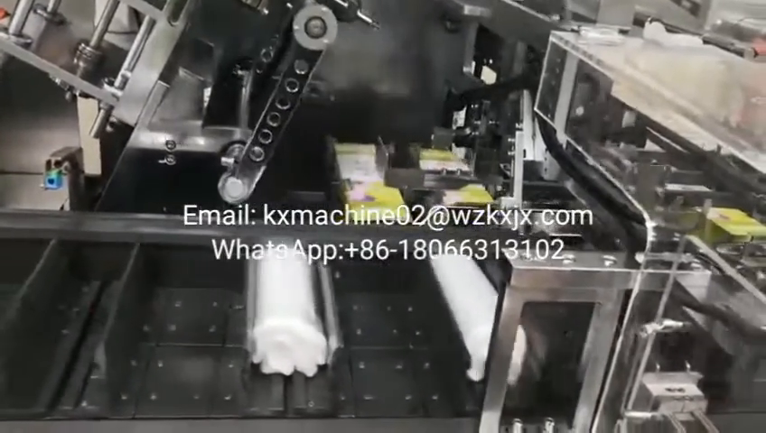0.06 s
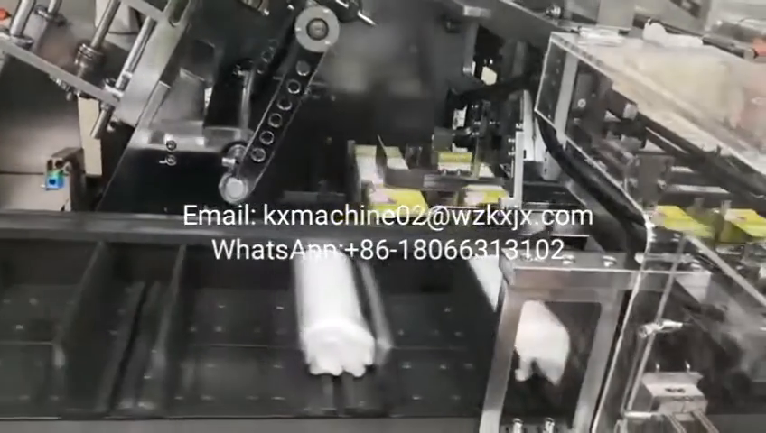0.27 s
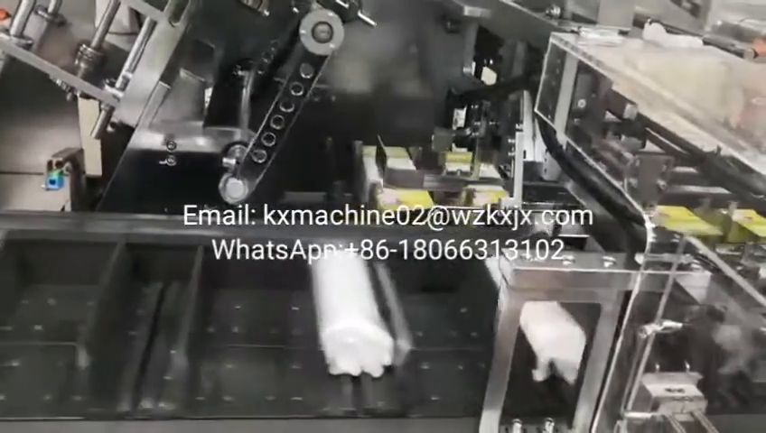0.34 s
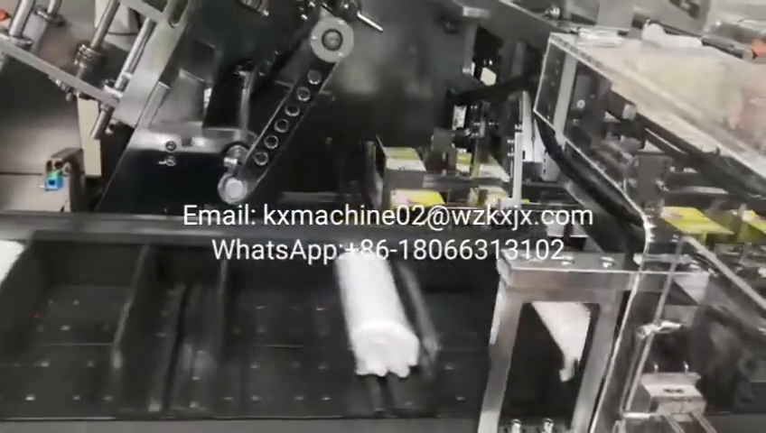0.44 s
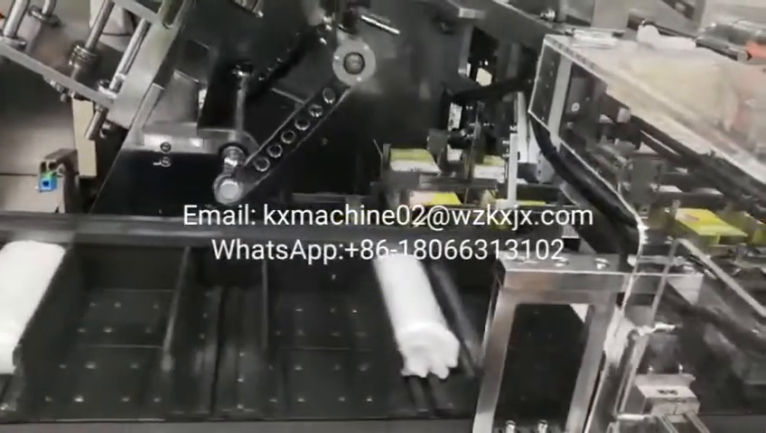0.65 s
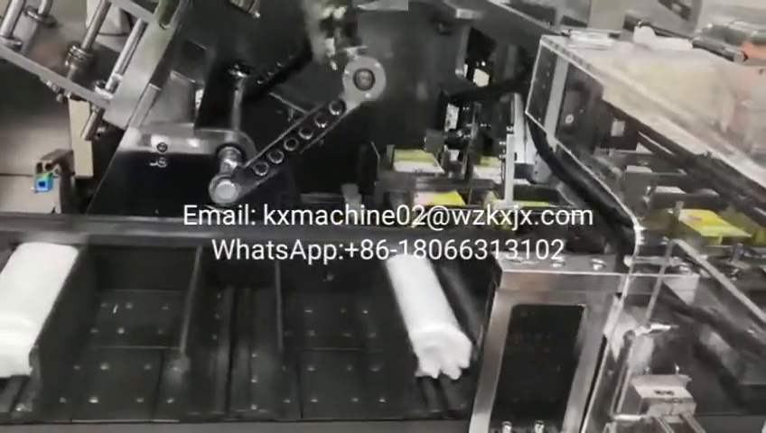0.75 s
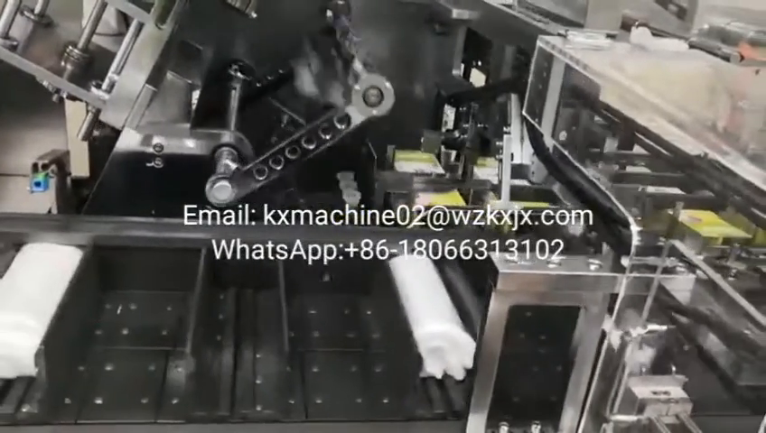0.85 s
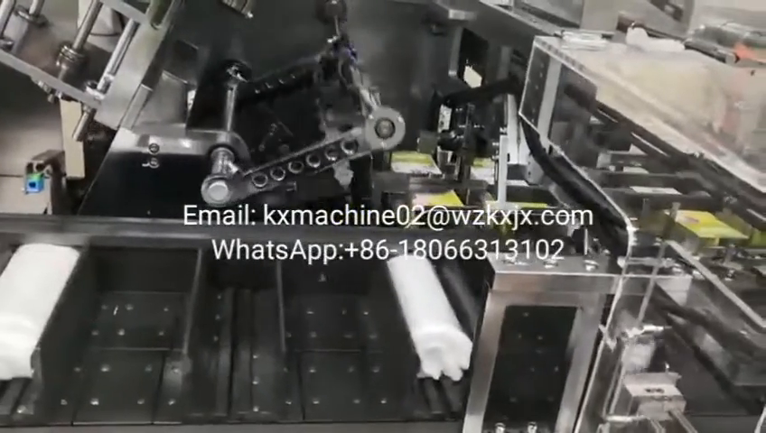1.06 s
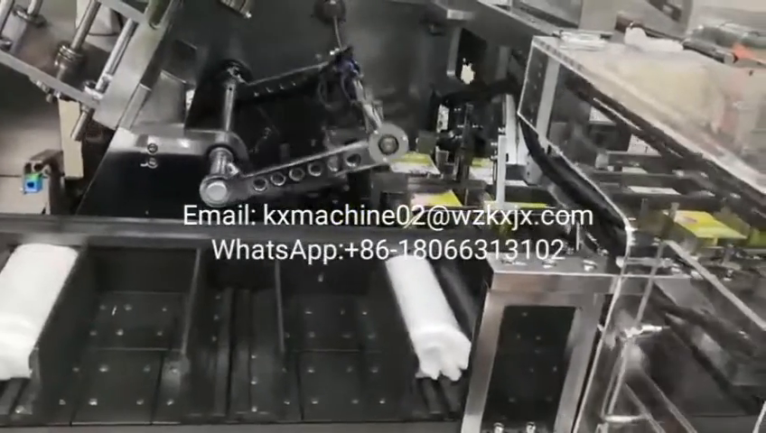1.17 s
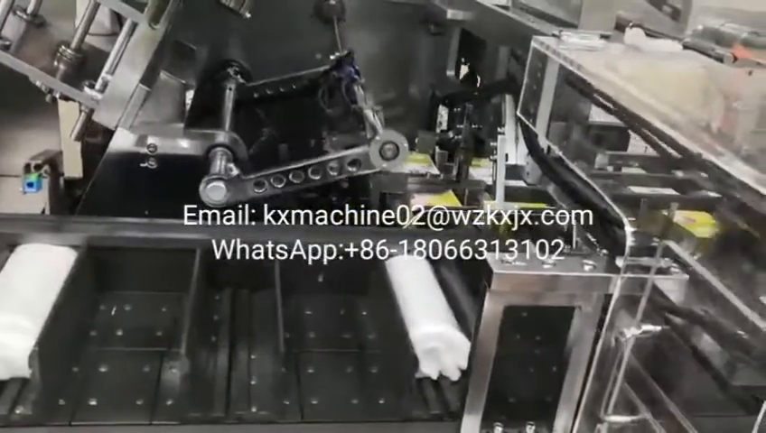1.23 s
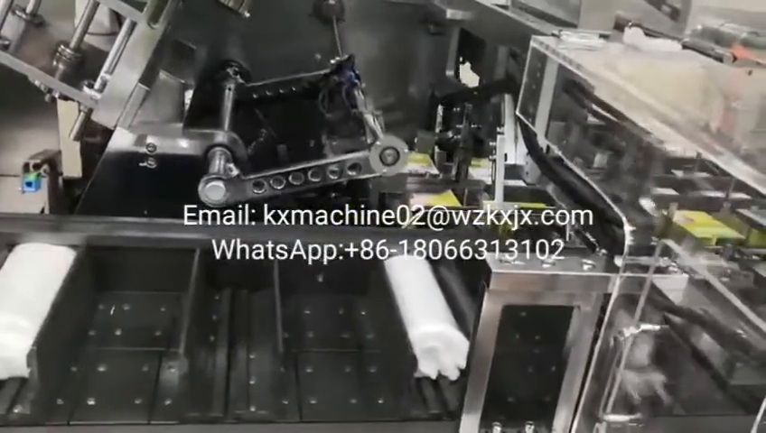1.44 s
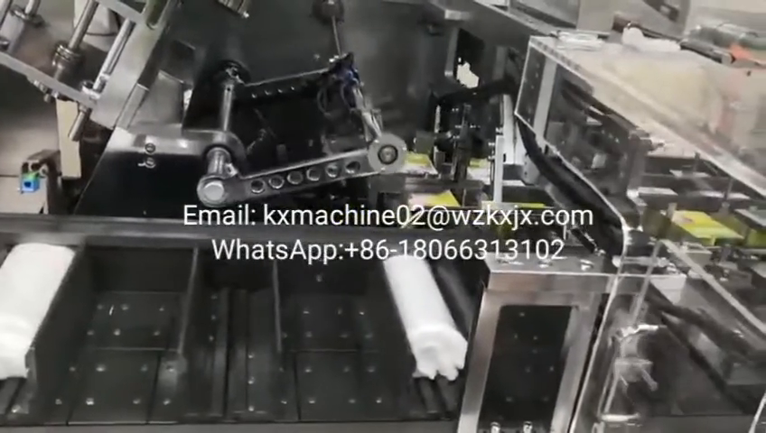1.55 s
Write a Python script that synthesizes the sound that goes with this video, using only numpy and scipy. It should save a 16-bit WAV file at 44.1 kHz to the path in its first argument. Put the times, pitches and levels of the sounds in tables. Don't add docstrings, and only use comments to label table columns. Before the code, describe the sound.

Close view of an automatic packing machine over steady motor whirr and thin gear whine: a swelling roller rush ends in a low thud, air hisses, metal clacks hard with hall echo, and faint distant air sighs.

```python
import sys
import numpy as np
from scipy import signal
from scipy.io import wavfile
from scipy.ndimage import uniform_filter1d

SR = 44100
rng = np.random.default_rng(int(sys.argv[2]) if len(sys.argv) > 2 else 0)


def boost(x):
    u = np.asarray(x, float) / 20
    return 10 ** u


def pcm_store(signal):
    levels = np.round(np.clip(np.atleast_2d(signal), -1, 1) * 32767)
    wavfile.write(sys.argv[1], SR, levels.astype(np.int16).T)


N = 70560
TIME_S = np.arange(N) / SR


def evened(x):
    return x / np.sqrt(np.mean(x ** 2) + 1e-20)


def curve_at(points, hz):
    point_hz, value = np.transpose(points)
    return np.interp(np.log(hz + 1), np.log(point_hz + 1), value)


def coloured(x, spectrum):
    hz = np.fft.rfftfreq(4096, 1 / SR)
    octaves_below = np.maximum(np.log2(spectrum[0][0] / (hz + 5)), 0)
    octaves_above = np.maximum(np.log2(hz / spectrum[-1][0] + 1e-9), 0)
    level_db = curve_at(spectrum, hz) - 24 * (octaves_below + octaves_above)
    half = np.log(boost(np.maximum(level_db, -110)))
    full = np.concatenate([half, half[-2:0:-1]])
    taps = np.fft.ifft(np.exp(np.conj(signal.hilbert(full)))).real
    return signal.oaconvolve(x, taps / np.linalg.norm(taps))[:len(x)]


def lumpy(patchy_db, flicker_db):
    a, b, patch = rng.standard_normal((N // 64 + 8, 129, 3)).T
    patch = uniform_filter1d(patch, size=3, axis=0)
    patch = evened(uniform_filter1d(patch, size=24, axis=1))
    flicker = evened(uniform_filter1d(rng.standard_normal(a.shape[1]), size=8))
    z = (a + 1j * b) * boost(patchy_db * patch + flicker_db * flicker)
    noise = signal.istft(z, nperseg=256, noverlap=192)[1]
    return evened(noise[256:N + 256])


def resonate(x, hz, width_hz):
    turn = np.exp(2j * np.pi * np.cumsum(hz * np.ones(len(x))) / SR)
    r = np.exp(-np.pi * width_hz / SR)
    return 2 * (turn * signal.lfilter([1 - r], [1, -r], x / turn)).real


def effort(curve, lead_s=0):
    time_s, level_db = np.transpose(curve)
    level_db = np.interp(TIME_S + lead_s, time_s, level_db, left=-120, right=-120)
    return uniform_filter1d(boost(level_db), size=120)


def burst(start_s, rise_s, level_db, t60_s):
    fall_db = 60 * np.maximum(TIME_S - start_s - rise_s, 0) / t60_s
    return np.clip((TIME_S - start_s) / rise_s, 0, 1) * boost(level_db - fall_db)


def blows(events, modes, rise_s):
    # hz, level_db
    knock_colour = [(25, -24), (70, 0), (4500, 0), (6000, -6), (8000, -30), (15000, -60)]
    out = np.zeros(N)
    t = np.arange(SR // 3) / SR
    chance = rng.standard_normal((len(events), len(modes), 2))
    middle_hz = modes[len(modes) // 2][0]
    for (start_s, blow_db, tilt_db), row in zip(events, chance):
        ring = np.zeros(len(t))
        for (hz, mode_db, t60_s), (luck, shift) in zip(modes, row):
            level_db = mode_db + tilt_db * np.log2(hz / middle_hz) + 1.5 * luck
            pitch_hz = hz * (1 + .02 * shift)
            ring += boost(level_db - 60 * t / t60_s) * np.sin(2 * np.pi * pitch_hz * t + 2 * shift)
        out[round(start_s * SR):][:len(t)] += boost(blow_db) * ring * (1 - np.exp(-t / rise_s))
    return 2 * coloured(out, knock_colour)


def motors():
    # hz, level_db (dB per Hz)
    rumble_colour = [(12, -37.5), (20, -17.5), (65, 0), (146, 0), (179, -3), (312, -6), (370, -9.5),
                     (406, -8.5), (800, -36), (1040, -52.5), (1760, -120)]
    whirr_colour = [(350, -39), (600, -16), (687, -15.5), (1940, -4.5), (2390, -7), (3380, -6.5),
                    (4610, -14), (5830, -23), (11500, -67.5), (15000, -100), (22000, -120)]
    # time_s, level_db
    load = [(0, -2.5), (.12, 0), (.22, 2), (.4, 1), (.55, 2.5), (.72, -2), (.85, 4.5), (1.03, 2.5),
            (1.1, -2), (1.27, 1), (1.38, 1.5), (1.62, -0.5)]
    # pitch_hz, level_db (rms)
    whine_table = [(134.6, -71), (1712, -59.5), (3020, -67.5), (3284, -77), (3397, -60), (3930, -63)]
    rumble = boost(-46) * effort(load) * coloured(lumpy(1.0, 0.3), rumble_colour)
    whirr = boost(-42) * coloured(lumpy(0.7, 0.57), whirr_colour)
    whines = np.zeros(N)
    for hz, level_db in whine_table:
        whines += boost(level_db) * evened(resonate(rng.standard_normal(N), hz, width_hz=3.6))
    return rumble + whirr + whines


def gear_tone():
    # time_s, level_db (rms)
    tone = [
        (0, -53),
        (.3, -61),
        (1.1, -62.5),
        (1.4, -55),
        (1.62, -56),
    ]
    tone_hz = 3460
    waver_hz = 1.3 * evened(uniform_filter1d(rng.standard_normal(N), size=3000))
    return np.sqrt(2) * effort(tone) * np.sin(2 * np.pi * np.cumsum(tone_hz + waver_hz) / SR)


def far_valves():
    # start_s, rise_s, level_db, t60_s
    puffs = [
        (.137, .003, -46, 0.17),
        (1.06, .03, -52, .5),
        (1.15, 0.0092, -58, 0.27),
    ]
    # hz, level_db (dB per Hz)
    far_colour = [(2500, -21), (4500, 3.5), (6000, -8), (8000, -22.5), (10000, -38.5), (15000, -57.5)]
    flow = sum(burst(*puff) for puff in puffs)
    return flow * coloured(lumpy(0.97, 1.3), far_colour)


def carriage_slide():
    # time_s, level_db
    slide = [
        (.1, -62),
        (.2, -38),
        (.26, -29),
        (.3, -24),
        (.36, -20.5),
        (.44, -21.5),
        (.5, -26),
        (.58, -35),
        (.68, -54.5),
    ]
    # hz, level_db (dB per Hz)
    rush_colour = [(530, -43), (900, -29), (1160, -14.5), (1390, -24.5), (1740, -7), (2110, -14.5),
                   (2600, -1), (3200, -4.5), (4330, -6.5), (7000, -33), (9100, -53), (15400, -120)]
    # pitch_hz, width_hz, level_db, lag_s
    rail_modes = [(1016, 81, -21.5, 0.14), (1647, 99, -7.5, .09), (1814, 190, -3.5, 0.056),
                  (2350, 55, -7, .03), (2580, 90, -5, 0.0071), (2717, 61, -0.5, 0.016),
                  (3580, 47, -3.5, -0.061), (4180, 90, -7.5, -0.036), (4400, 130, -9.5, .01),
                  (4890, 110, -12, .01)]
    # hz, level_db (dB per Hz)
    shudder_colour = [(24, -39), (40, -17), (146, -3.5), (204, -6), (264, -5.5), (364, -19), (1000, -25.5),
                      (1300, -57), (2200, -120)]
    fizz_colour = [(3240, -26.5), (5500, 1), (6110, -10), (7750, -17.5), (8460, -28.5), (14400, -52.5),
                   (15100, -52), (15500, -82)]
    rush = coloured(lumpy(1.4, 0.27), rush_colour)
    rail = np.zeros(N)
    for hz, width_hz, level_db, lag_s in rail_modes:
        ring = evened(resonate(resonate(rush, hz, width_hz), hz, width_hz))
        rail += boost(level_db - 6) * effort(slide, -lag_s) * ring
    speed = effort(slide)
    top = speed.max()
    shudder = boost(-36.5) * (speed / top) ** 0.73 * coloured(lumpy(2.5, 1.0), shudder_colour)
    fizz_strength = boost(-38) * (effort(slide, lead_s=0.034) / top) ** 1.4
    fizz = fizz_strength * coloured(lumpy(3.7, 1.2), fizz_colour)
    fizz *= np.clip((0.68 - TIME_S) / 0.043, 0, 1)
    return 0.84 * (speed * rush + 0.43 * rail) + shudder + fizz


def carriage_stop():
    # start_s, level_db, brightness_db (per octave)
    thuds = [
        (.458, -33.5, .1),
        (.465, -23, .1),
        (.477, -29, .1),
        (.487, -26, .1),
        (.51, -34, .1),
        (.532, -35.5, 1.7),
        (.55, -36.5, 1.5),
    ]
    # pitch_hz, level_db, t60_s
    frame = [(78, -5.5, 0.13), (96, -8, 0.091), (153, -5.5, .07), (199.3, 4.5, 0.071), (241, -12, 0.15),
             (334, -6.5, 0.057), (510, -9, 0.056), (612, -10.5, 0.028), (1189, -10.5, .12)]
    return 0.26 * blows(thuds, frame, rise_s=0.0016)


def valve():
    # time_s, level_db
    vent = [
        (.742, -45),
        (.757, -44),
        (.765, -34),
        (.81, -32.5),
        (.846, -27.5),
        (.87, -30),
        (.93, -41),
        (.96, -47),
        (1.0, -63),
    ]
    # hz, level_db (dB per Hz)
    push_colour = [(24, -23), (40, -5.5), (86, 0.5), (177, -4.5), (295, -11.5), (500, -33.5), (650, -53),
                   (1100, -120)]
    jet_colour = [(530, -51.5), (900, -10), (1120, -4), (1430, -29), (1710, -1.5), (4390, -1), (5710, -5.5),
                  (9650, -38), (15050, -51), (15500, -77.5)]
    spit_colour = [(5000, -53), (8500, -22.5), (10600, -18.5), (13000, -9.5), (14400, 0), (15050, -1.5),
                   (15300, -25), (15700, -55)]
    # start_s, rise_s, level_db, t60_s
    spits = [
        (.136, .002, -75.5, .1),
        (.458, .012, -72, .1),
        (.744, 0.00089, -63.5, .1),
        (.76, .008, -58, .15),
        (.79, .01, -76.5, .3),
        (.851, .001, -64.5, .08),
        (.86, 0.0046, -69, 0.1),
        (1.08, .09, -83, 1.3),
    ]
    spit_flow = np.zeros(N)
    for start_s, rise_s, level_db, t60_s in spits:
        shut = np.clip((start_s + .2 + 0.033 - TIME_S) / .03, 0, 1)
        spit_flow += shut * burst(start_s, rise_s, level_db, t60_s)
    swell = np.sin(np.pi * np.clip((TIME_S - 0.64) / 0.23, 0, 1))
    push = boost(-41.5) * swell * coloured(lumpy(2.2, 1.3), push_colour)
    jet = effort(vent) * coloured(lumpy(2.0, 1.3), jet_colour)
    return push + jet + spit_flow * coloured(lumpy(1.7, 2.2), spit_colour)


def exhaust():
    # time_s, level_db
    exhaust_flow = [
        (.851, -43),
        (0.876, -28.5),
        (.91, -28),
        (.95, -30.5),
        (.98, -32.5),
        (1.028, -34),
        (1.044, -41.5),
        (1.15, -52),
    ]
    # hz, level_db (dB per Hz)
    blow_colour = [(180, -34.5), (300, -5.5), (601, -14), (1020, -7.5), (2160, 0.5), (2810, -1),
                   (3330, -10.5), (5550, -14.5), (12000, -62.5), (15600, -87), (22000, -120)]
    # pitch_hz, width_hz, level_db
    pipe_modes = [(1994, 110, -3), (2164, 230, -2), (2480, 51, -2), (2948, 90, -5.5), (3320, 170, 2.5),
                  (4060, 90, -8.5), (4230, 110, -5)]
    flow = effort(exhaust_flow)
    air = lumpy(1.5, .6)
    pipe = np.zeros(N)
    for hz, width_hz, level_db in pipe_modes:
        pipe += boost(level_db) * evened(resonate(resonate(air, hz, width_hz), hz, width_hz))
    blow = (flow / flow.max()) ** (2.23 - 1) * coloured(air, blow_colour)
    return flow * (boost(-3) * evened(pipe) + blow)


def arm():
    # start_s, level_db, brightness_db (per octave)
    clacks = [
        (.8512, -11.5, -1),
        (.855, -18, -2.5),
        (.859, -19, 2),
        (0.8614, -11.5, 0.5),
        (0.8646, -14, 0.5),
        (.869, -18.5, 1.5),
        (0.8747, -19.5, -2),
        (.879, -22, -1.5),
    ]
    # pitch_hz, level_db, t60_s
    arm_modes = [(693, -22.5, 0.042), (887, -18, 0.053), (1053, -10, 0.059), (1684, -3.5, 0.069),
                 (1775, -1.5, 0.063), (1925, -3.5, 0.038), (2540, -19, .05), (2974, -7, 0.095),
                 (3320, -11, 0.041), (3500, -25.5, 0.042), (3830, -11.5, 0.1), (4490, -10.5, 0.054),
                 (5100, -8, 0.033)]
    # hz, level_db (dB per Hz)
    crack_colour = [(290, -60), (500, -20), (955, -4.5), (1410, -26.5), (1750, 1), (2650, -16),
                    (2930, -12.5), (3800, -1.5), (15600, -65)]
    crack = np.zeros(N)
    for start_s, level_db, _ in clacks:
        fade = np.exp(-np.maximum(TIME_S - start_s, 0) / 0.0044)
        crack += (TIME_S >= start_s) * boost(level_db - 9) * fade
    ring = 0.089 * blows(clacks, arm_modes, rise_s=0.00017)
    return ring + coloured(crack * rng.standard_normal(N), crack_colour)


def hall(x):
    # hz, t60_s
    decay = [(500, 0.19), (1000, 0.38), (2200, 0.22), (4000, 0.82), (8000, 0.24)]
    echoes = np.zeros(SR)
    at = np.arange(300, SR - 20, 20)
    echoes[at + rng.integers(0, 20, len(at))] = rng.choice([-1., 1.], len(at))
    hz, t, z = signal.stft(echoes, SR, nperseg=256)
    fade = boost(-60 * t / curve_at(decay, hz)[:, None])
    tail = signal.istft(z * fade, SR, nperseg=256)[1]
    return signal.fftconvolve(x, tail / np.linalg.norm(tail))[:N]


def scene():
    background = motors() + gear_tone() + far_valves()
    carriage = carriage_slide() + carriage_stop()
    air = valve() + exhaust()
    clack = arm()
    return (background + carriage + air + clack + boost(-9.5) * hall(clack))[None]


def top_cut(x):
    return signal.sosfilt(signal.butter(12, 15700, fs=SR, output="sos"), x)


def record(dry):
    # hz, level_db
    shelf = [(20, -3), (7800, -1), (8300, -4.5), (12000, -1.5), (15100, 4), (15600, -10.5), (16000, -29.5)]
    mix = 1.021 * coloured(dry[0], shelf)[None]
    return top_cut(mix)


dry = scene()
out = record(dry)
pcm_store(out)
```